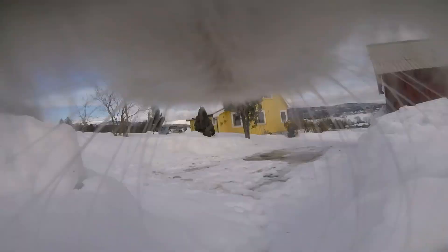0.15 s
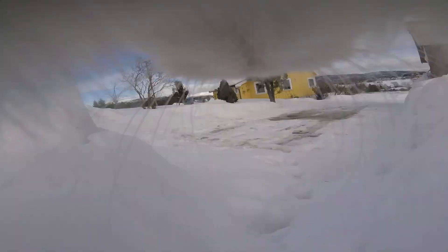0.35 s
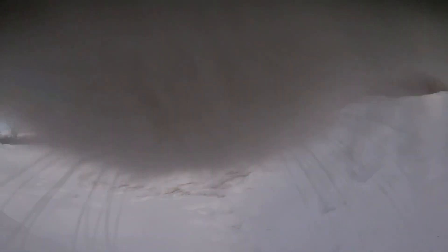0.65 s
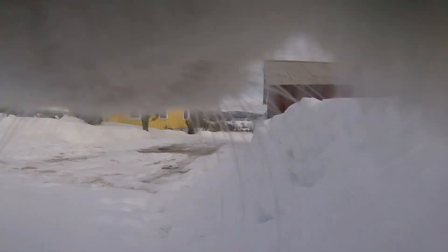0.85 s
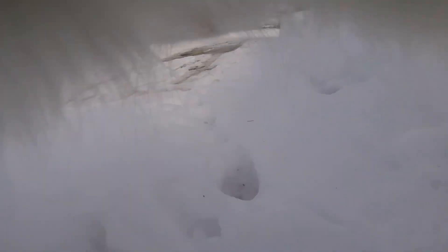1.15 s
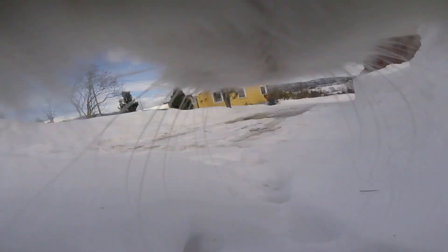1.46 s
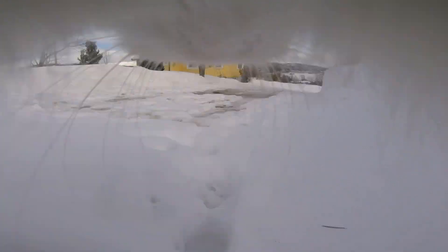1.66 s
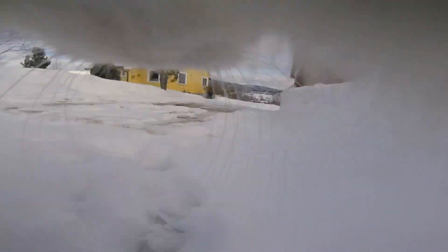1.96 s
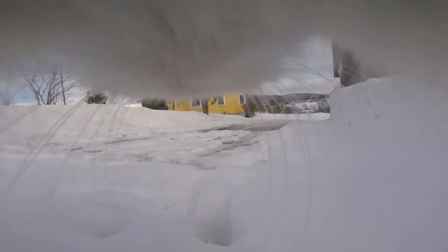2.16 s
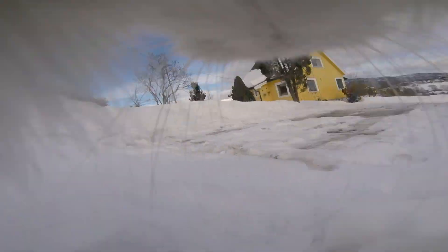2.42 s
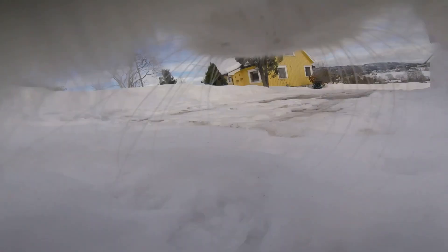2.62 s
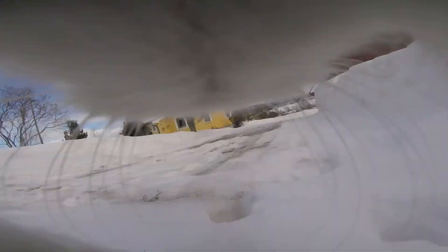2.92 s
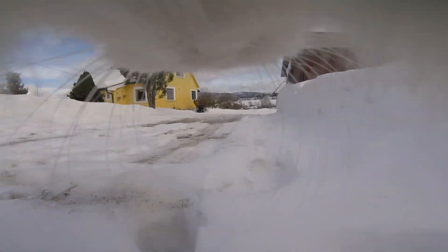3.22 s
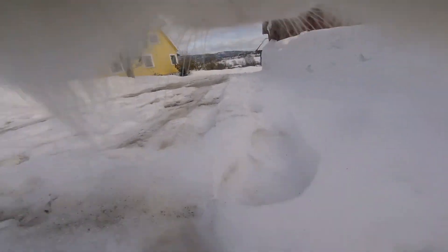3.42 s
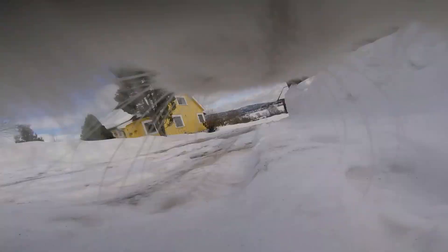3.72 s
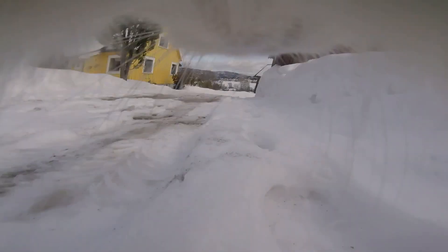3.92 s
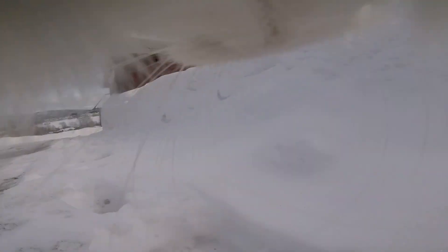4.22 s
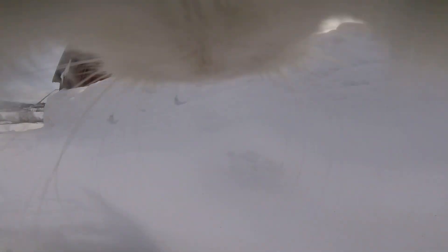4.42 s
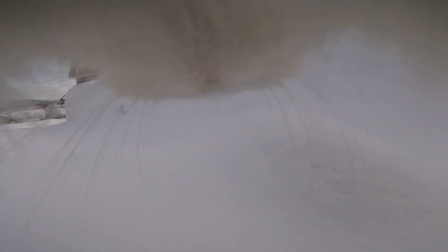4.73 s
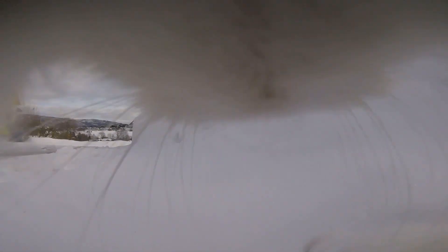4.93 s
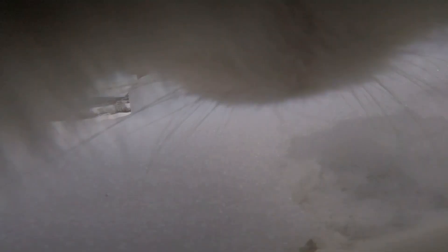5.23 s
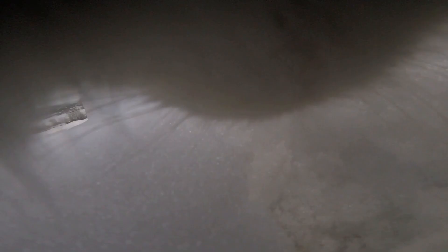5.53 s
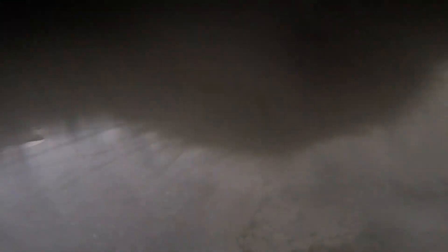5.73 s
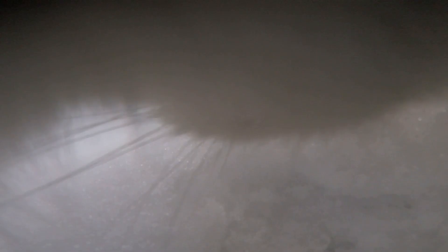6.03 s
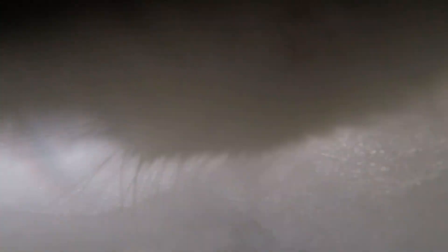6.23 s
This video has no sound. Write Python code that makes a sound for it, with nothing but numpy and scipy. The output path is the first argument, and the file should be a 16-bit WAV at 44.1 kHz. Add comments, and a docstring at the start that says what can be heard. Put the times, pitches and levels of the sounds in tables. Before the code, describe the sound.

A cat walks through snow outdoors, heard from a small camera swinging under its chin. A low, lumpy rumble runs throughout, with deep thumps as paws land. With each stride the plastic mount ticks, the case knocks softly against the chest and fur rubs over it. Now and then snow gives way in a short, gritty crunch. The jostling peaks midway, then eases. Everything is very close and dry, over a faint hiss.

```python
"""First comes a low rumble: a small camera sways under the chin of a cat walking through snow.
With each stride its mount ticks, its case knocks softly on the cat's chest and fur rubs over it.
Now and then snow gives way close by in a short, gritty crunch.
Everything is heard from the case itself, with no echo, over a faint hiss."""
import sys
import numpy as np
from scipy import signal
from scipy.fft import rfft, irfft, next_fast_len
from scipy.io import wavfile
from scipy.ndimage import uniform_filter1d

SR = 44100
rng = np.random.default_rng(int(sys.argv[2]) if len(sys.argv) > 2 else 0)


def put_to_file(sound):
    """Save the sound as 16-bit audio at rate SR, in the file named by the first command-line argument."""
    columns = np.atleast_2d(sound).T  # one column per channel
    safe = np.clip(columns, -1, 1)
    whole_steps = np.round(safe * 32767)
    wavfile.write(sys.argv[1], SR, whole_steps.astype(np.int16))


N = 280917
TIME = np.arange(N) / SR


def from_db(db):
    """Turn decibels (dB) into a gain, the number a sound is multiplied by."""
    return 10 ** (np.asarray(db) / 20)


def unit_power(x):
    """Scale a sound so that its average power is 1."""
    return x / np.sqrt(np.mean(x ** 2) + 1e-20)


def drift(rate):
    """A smooth random wobble of size about 1, changing about rate times a second."""
    hz = np.arange(N // 2 + 1) * SR / N
    return unit_power(irfft(rfft(rng.standard_normal(N)) / (1 + (hz / rate) ** 4), N))


def colour(x, tone):
    """Filter a sound to follow a tone table of frequencies and levels, then set its power to 1."""
    size = 2 * next_fast_len(N // 2 + SR // 4)
    hz, db = np.transpose(tone)
    grid_hz = np.maximum(np.arange(size // 2 + 1) * SR / size, 1)
    octaves_outside = np.maximum(np.log2(hz[0] / grid_hz), 0) + np.maximum(np.log2(grid_hz / hz[-1]), 0)
    curve_db = np.interp(np.log(grid_hz), np.log(hz), db) - 18 * octaves_outside
    # these steps make the filter ring after each click, never before it
    cepstrum = irfft(np.log(from_db(curve_db)))
    cepstrum[1:size // 2] *= 2
    cepstrum[size // 2 + 1:] = 0
    return unit_power(irfft(rfft(x, size) * np.exp(rfft(cepstrum)))[:N])


def grains(per_s, spread_db):
    """Tiny clicks at random moments, of uneven size and either sign."""
    sizes = from_db(spread_db * np.minimum(rng.exponential(1, N), 4))
    return (rng.random(N) < per_s / SR) * sizes * rng.choice([-1, 1], N)


def steady(x, seconds):
    """Even out the loudness over the given time, keeping the finer texture."""
    outline = np.abs(signal.hilbert(x, next_fast_len(N))[:N])
    power = uniform_filter1d(outline ** 2, max(int(seconds * SR), 1))
    return unit_power(x / np.sqrt(np.maximum(power, 0) + power.mean() / 20))


def ring(hz, ring_s, attack_s):
    """A pure tone that swells in, then fades by 60 dB over ring_s seconds."""
    t = TIME[:SR // 20]
    return np.sin(2 * np.pi * hz * t) * from_db(-60 * t / ring_s) * (1 - np.exp(-t / attack_s))


def add(track, start_s, sound):
    """Mix a sound into the track at the given time."""
    start = max(round(start_s * SR), 0)
    track[start:start + len(sound)] += sound[:N - start]


def swells(starts, lengths, levels_db, attack_s, release_s, sag_db_per_s, rest_db):
    """Gain for a run of movements: each swells, sags while it lasts and dies away to a resting level."""
    power = np.full(N, from_db(rest_db) ** 2)
    for start, length, db in zip(starts, lengths, levels_db):
        t = TIME[:int((length + 6 * release_s) * SR)]
        shape = np.minimum(t / attack_s, 1) * np.exp(-np.maximum(t - length, 0) / release_s)
        add(power, start, (shape * from_db(db - sag_db_per_s * t)) ** 2)
    return np.sqrt(power)


# The camera swings on its collar. Each row: start in seconds, length in seconds, level in dB.
CAMERA_SWINGS = [(0.0, 0.013, -33.5), (0.172, 0.26, -41), (0.799, 0.13, -35), (1.02, 0.094, -49.5),
                 (1.241, 0.28, -36.5), (1.746, 0.27, -41.5), (2.356, 0.16, -28), (2.569, 0.23, -34.5),
                 (3.072, 0.21, -43), (3.42, 0.18, -30), (3.77, 0.18, -41), (4.41, 0.064, -40),
                 (5.003, 0.19, -42), (5.292, 0.037, -36.5), (5.562, 0.048, -40), (5.744, 0.38, -51),
                 (6.104, 0.038, -32.5), (6.177, 0.25, -37.5)]
# The tone of the rumble. Each row: frequency in Hz, relative level in dB.
RUMBLE_TONE = [(12, -9.5), (20, -2.5), (28, -1.5), (40, -10.5), (60, -17.5), (90, -21.5), (140, -35)]
# A paw lands heavily. Each row: time of the peak in seconds, peak level in dB, swing frequency in Hz.
PAW_JOLTS = [(0.273, -15.5, 17.9), (1.092, -36, 58), (1.355, -18.5, 19.7), (1.914, -21.5, 16.4),
             (2.448, -21, 12.2), (3.572, -12, 27), (5.33, -32, 54), (6.125, -28.5, 46)]


def camera_sway():
    """The swinging case pushes air at the microphone in slow lumps; a heavy paw gives one big swing."""
    swing = swells(*np.transpose(CAMERA_SWINGS),
                   attack_s=0.031, release_s=0.059, sag_db_per_s=6, rest_db=-52)
    rumble = swing * steady(colour(rng.standard_normal(N), RUMBLE_TONE), seconds=0.047)
    for peak_s, db, hz in PAW_JOLTS:
        phase = np.pi * hz * (TIME - peak_s)
        rumble += from_db(db) * (1 - 2 * phase ** 2) * np.exp(-phase ** 2)
    return rumble


# The tone of the background. Each row: frequency in Hz, relative level in dB.
AIR_TONE = [(100, 2), (500, -19), (1000, -20), (2100, -22), (4000, -31.5), (5400, -26), (8000, -25),
            (12500, -29), (14000, -48)]


def open_air():
    """Open air and the microphone's own hiss make a faint, even background."""
    return from_db(-67.5) * colour(rng.standard_normal(N), AIR_TONE)


# The mount ticks. Each row: start in seconds, level near 2 kHz in dB, then how many dB
# louder than that the body (low), the snap (middle) and the treble (high) are.
MOUNT_TICKS = [(0.1132, -49, -11, -5.5, -18), (0.1936, -43.5, -14, -22, -11), (0.393, -51.5, -3, -24, -20),
               (0.5764, -50, -12, -22, -22), (0.8299, -42.5, -11, -4.5, -6),
               (1.0116, -42.5, -11.5, -24, -15), (1.1138, -49.5, -7, -6, -15), (1.2666, -38, -8, -16, -15),
               (1.285, -42.5, -16, -8, -10), (1.3546, -42.5, 1.5, -7, -8.5), (1.4346, -49, -1, -20, -6),
               (1.7504, -40.5, -16, -20, -19), (1.758, -38, -4.5, -8.5, -0.5),
               (1.8578, -40, -12, -7.5, -16), (1.9799, -52.5, 5, -19, -15), (2.34, -55.5, 5, -22, -15),
               (2.4299, -40, -4, -1, 0), (2.6023, -32, -24, -3.5, -12), (2.775, -50, 3, -5, 1),
               (2.8618, -35.5, -16, -9, -8.5), (3.016, -34.5, -7, -17, -7), (3.0228, -36, 0, 4.5, -2),
               (3.537, -50, 9, -11, -2), (3.571, -30.5, -12, 0.5, -5.5), (3.5777, -42.5, 8, 8.5, -5),
               (3.5967, -42.5, 6.5, 1, -7), (3.6262, -32, -26, -11, -6), (3.783, -42, 0, -29, -12),
               (3.9727, -32.5, -14, -18, -18), (3.9795, -33, -2.5, -8, -3), (4.1632, -48.5, -4.5, -22, -15),
               (4.3448, -44.5, -21, -30, -30), (4.6685, -50, -19, -18, -36), (4.8123, -50, -5, -7, -13),
               (4.8676, -36, -2.5, -5.5, -6.5), (5.0177, -43, 6, 2.5, 5.5), (5.271, -47.5, -2, -23, -20),
               (6.1232, -35, -1.5, -14, -12)]
# The notes the mount rings at. Each row: pitch in Hz, relative level in dB, usual ring time in seconds.
MOUNT_NOTES = [(1380, 3.5, .010), (2030, 1, .015), (2430, -0.5, 0.0092), (3220, 4.5, 0.0053),
               (3900, 3, 0.0049), (4920, -3, 0.013), (6000, 2, 0.0041)]


def mount_ticks():
    """Plastic hits plastic: the spot it hits picks the notes, and a hard hit chokes their ring."""
    track = np.zeros(N)
    regions_hz = [1370, 2200, 3300, 5200]
    chances = rng.standard_normal((len(MOUNT_TICKS), len(MOUNT_NOTES), 2))
    for (start, db, body_db, snap_db, treble_db), chance in zip(MOUNT_TICKS, chances):
        ring_stretch = from_db(-0.25 * np.clip(treble_db + 13, -12, 12))  # brighter ticks die sooner
        for k, ((hz, note_db, ring_s), (detune, random_db)) in enumerate(zip(MOUNT_NOTES, chance)):
            contact_db = np.interp(hz, regions_hz, [body_db, 0, snap_db, treble_db])
            gain = from_db(db + note_db + contact_db + random_db)
            note = ring(hz * (1 + 0.027 * detune), ring_s * ring_stretch, attack_s=0.00007)
            add(track, start, gain * (-1) ** k * note)
    # so small a part gives off no bass, and the case muffles its highest notes
    return signal.sosfilt(signal.butter(4, (700, 8500), "band", fs=SR, output="sos"), track)


# Soft knocks on the case. Each row: start in seconds, peak level in dB, pitch in Hz.
CASE_KNOCKS = [(0.1726, -42.5, 510), (0.241, -43, 405), (0.831, -47, 327), (1.055, -45.5, 324),
               (1.092, -40, 423), (1.248, -37.5, 460), (1.285, -35.5, 560), (1.2989, -33.5, 394),
               (1.3544, -34.5, 396), (1.495, -37, 148), (1.5306, -41, 296), (1.7967, -43, 358),
               (1.861, -38.5, 139), (2.6164, -29.5, 460), (2.7741, -37.5, 276), (2.9889, -25.5, 223),
               (3.0146, -25.5, 418), (3.158, -44.5, 372), (3.2376, -41, 418), (3.4116, -32.5, 373),
               (3.4337, -27.5, 560), (3.4688, -32, 280), (3.5448, -36, 435), (3.5955, -30.5, 460),
               (3.634, -30.5, 416), (3.7381, -42.5, 438), (3.7953, -43, 333), (3.845, -34.5, 124),
               (3.8475, -37.5, 342), (4.1768, -43.5, 387), (4.485, -49, 234), (4.689, -49.5, 304),
               (4.797, -31, 79), (4.7977, -42, 328), (4.8105, -41, 227), (4.8729, -38.5, 445),
               (5.1254, -35, 430), (5.3389, -35, 500), (5.588, -38, 120), (6.116, -34.5, 122),
               (6.129, -45, 410)]


def case_knocks():
    """The case bumps the furry chest and rings very briefly; more cushioned bumps sound lower."""
    track = np.zeros(N)
    for (start, db, hz), sign in zip(CASE_KNOCKS, rng.choice([-1, 1], len(CASE_KNOCKS))):
        bump = ring(hz, ring_s=3.38 / hz, attack_s=0.46 / hz)
        add(track, start, sign * from_db(db) * bump / bump.max())
    return track


# Fur strokes the case. Each row: start in seconds, length in seconds, level in dB, brightness in dB.
FUR_STROKES = [(0.174, 0.047, -57.5, -2), (0.23, 0.049, -55.5, -8), (0.315, 0.12, -65.5, -2),
               (0.389, 0.069, -56.5, -13), (0.545, 0.2, -79.5, 16), (0.72, 0.044, -69, -8),
               (0.768, 0.13, -60, 3), (1.001, 0.19, -59.5, -3), (1.259, 0.12, -52, -1.5),
               (1.408, 0.063, -61, 0), (1.474, 0.082, -51, -3), (1.584, 0.053, -64.5, -2),
               (1.699, 0.095, -61.5, 4.5), (1.809, .23, -55.5, 2), (2.042, 0.053, -58, -11),
               (2.356, 0.12, -48.5, -0.5), (2.48, 0.1, -58.5, -4), (2.613, 0.067, -51.5, -4),
               (2.736, 0.13, -55.5, 3.5), (2.897, 0.067, -58.5, 7.5), (3.029, .09, -58.5, 3.5),
               (3.144, 0.13, -62.5, 5.5), (3.327, 0.12, -61, 0), (3.424, .18, -50.5, -3),
               (3.757, 0.093, -57, -2.5), (3.897, 0.08, -60, -3), (4.0, 0.019, -66, 3),
               (4.137, 0.046, -64.5, -13), (4.27, 0.17, -69, 1), (4.52, 0.029, -85, -15),
               (4.683, 0.17, -69, -12), (4.852, 0.023, -55.5, 3), (4.945, 0.092, -61, 6),
               (5.024, 0.07, -56.5, -1), (5.098, 0.31, -62, 4.5), (5.258, 0.13, -55, 1.5),
               (5.431, 0.095, -59, 4), (5.539, 0.068, -59.5, 8), (5.65, .06, -70, -8),
               (5.758, 0.16, -65, 1.5), (5.904, 0.14, -60.5, -6), (6.097, 0.18, -55.5, 4),
               (6.252, 0.23, -50.5, -12)]
# The tones of the fur's scuff, rustle and hiss, and of snapping snow crystals (here and in the crunches).
# Each row: frequency in Hz, relative level in dB.
SCUFF_TONE = [(45, -14.5), (80, -6), (150, 2), (250, -2.5), (450, -6.5), (750, -11), (1100, -20),
              (2000, -36.5)]
RUSTLE_TONE = [(550, -15), (950, 1.5), (1500, 0.5), (2150, -2.5), (3200, -6), (4200, -9), (6000, -35)]
HISS_TONE = [(3600, -33), (4500, -1.5), (5100, 4.5), (6000, 2), (6800, -6), (7900, -6), (9200, -13),
             (12500, -24.5), (14000, -27)]
CRYSTAL_TONE = [(900, -12.5), (1900, -4), (2750, 7), (3800, -7), (5300, 10.5), (6600, 0.5), (7700, 3.5),
                (8900, -8.5), (10000, -16), (13000, -45)]


def fur_rub():
    """Hairs catch and slip on the case: a dull scuff, a grainy rustle and a hiss in the microphone hole."""
    starts, lengths, db, bright_db = np.transpose(FUR_STROKES)
    stroke = dict(attack_s=0.018, release_s=0.026, sag_db_per_s=3.5)
    # rest_db is the fur lying on the case between strokes
    scuff = swells(starts, lengths, db, **stroke, rest_db=-71)
    rustle = swells(starts, lengths, db - 9.5 + 0.19 * bright_db, **stroke, rest_db=-79)
    hiss = swells(starts, lengths, db - 14.5 + bright_db, **stroke, rest_db=-87.5)
    crystals = from_db(-11.5) * rustle  # lone grains snap within the rustle
    pressure = drift(rate=52)  # the fur presses unevenly, so scuff, rustle and hiss flutter together
    # fill each loudness outline with its own grainy sound
    scuff_grains = colour(grains(per_s=2500, spread_db=4), SCUFF_TONE)
    scuff *= from_db(2 * pressure) * steady(scuff_grains, seconds=0.021)
    rustle *= from_db(2.55 * pressure) * colour(grains(per_s=9000, spread_db=2), RUSTLE_TONE)
    hiss *= from_db(2 * pressure) * colour(grains(per_s=16000, spread_db=0.5), HISS_TONE)
    crystals *= colour(grains(per_s=100, spread_db=-1), CRYSTAL_TONE)
    return scuff + rustle + hiss + crystals


# Snow gives way. Each row: time of the peak in seconds, rise in seconds, fall in seconds,
# level of the jerks in dB, level of the fine grit in dB.
SNOW_CRUNCHES = [(0.185, 0.018, 0.026, -66, -64), (1.254, 0.0058, 0.007, -60, -55.5),
                 (1.297, 0.015, 0.037, -46.5, -68), (1.358, 0.0043, 0.027, -51, -69),
                 (2.42, 0.033, 0.054, -51, -66), (2.616, 0.0096, 0.055, -48.5, -63),
                 (2.989, 0.005, 0.015, -36.5, -71), (3.003, 0.0042, 0.012, -33, -61),
                 (3.012, 0.0049, 0.025, -35.5, -53), (3.44, 0.0088, 0.048, -45, -68),
                 (3.495, 0.032, .04, -47, -67), (3.578, 0.0043, 0.065, -49.5, -59),
                 (3.636, 0.011, 0.008, -44.5, -63), (3.691, .004, 0.0072, -77, -68),
                 (4.801, 0.0081, 0.0056, -57, -57), (4.816, 0.0021, 0.007, -52, -68),
                 (4.874, 0.0094, 0.05, -57, -60), (5.316, 0.0044, 0.01, -41.5, -38),
                 (5.334, 0.019, 0.061, -43.5, -48.5), (5.594, 0.0087, 0.0067, -58, -66),
                 (6.355, 0.022, .02, -50.5, -61)]
# The tone of the jerks. Each row: frequency in Hz, relative level in dB.
JERK_TONE = [(50, -1.5), (140, 7), (400, -3.5), (680, -9), (950, -7.5), (1800, -13.5), (2800, -18.5),
             (4100, -25), (5400, -25.5), (9500, -35.5), (13000, -46)]


def snow_crunches():
    """Packed snow collapses in sharp jerks while its crystals break in a fine grit."""
    jerk_gain, grit_gain = np.zeros((2, N))
    for peak_s, rise_s, fall_s, jerk_db, grit_db in SNOW_CRUNCHES:
        load = np.interp(TIME - peak_s, [-rise_s, 0, fall_s], [0, 1, 0]) ** 0.38
        jerk_gain += from_db(jerk_db) * load
        grit_gain += from_db(grit_db) * load
    clumps = from_db(3.3 * drift(rate=200))  # breaks come in bunches, as one sets off its neighbours
    jerks = colour(clumps * grains(per_s=1500, spread_db=2), JERK_TONE)
    grit = colour(clumps * grains(per_s=12000, spread_db=-1), CRYSTAL_TONE)
    return jerk_gain * steady(jerks, seconds=0.022) + grit_gain * steady(grit, seconds=0.0068)


def scene():
    """Add all the sounds together in one channel."""
    return (open_air() + camera_sway() + fur_rub() + snow_crunches() + mount_ticks() + case_knocks())[None]


def record(dry):
    """The camera cuts off the highest treble."""
    cutoff_hz = 13600
    return signal.sosfilt(signal.ellip(10, 0.2, 80, cutoff_hz, fs=SR, output="sos"), dry)


dry = scene()
out = record(dry)
put_to_file(out)
```